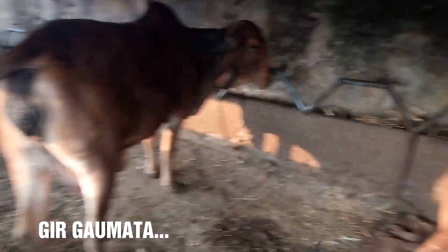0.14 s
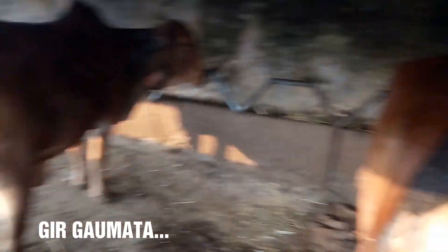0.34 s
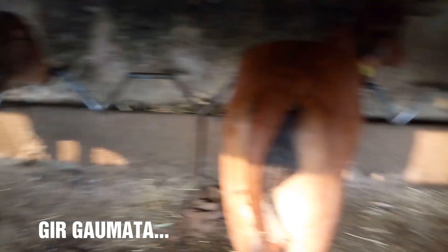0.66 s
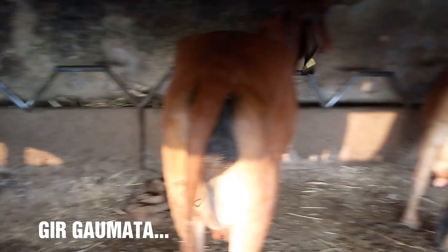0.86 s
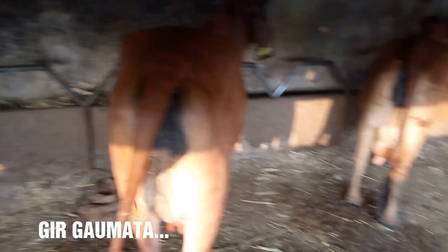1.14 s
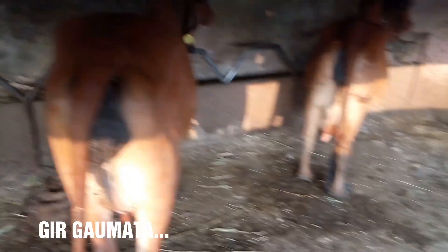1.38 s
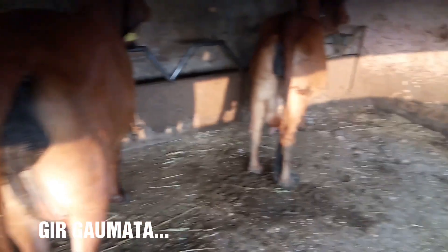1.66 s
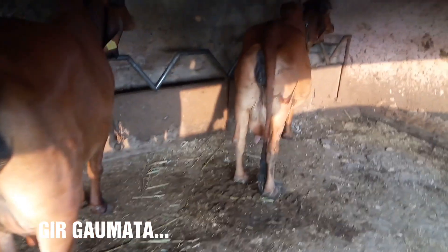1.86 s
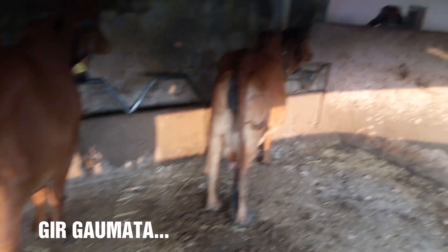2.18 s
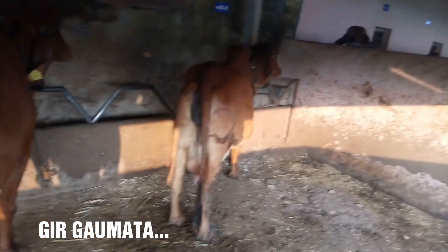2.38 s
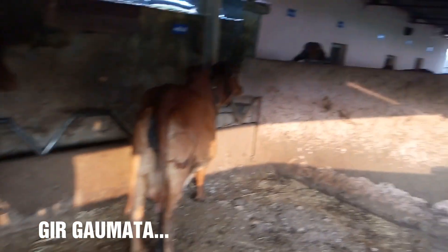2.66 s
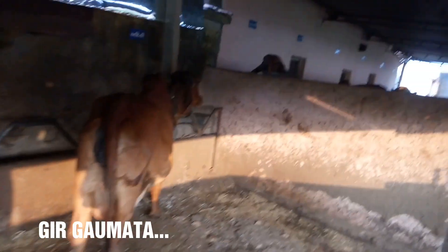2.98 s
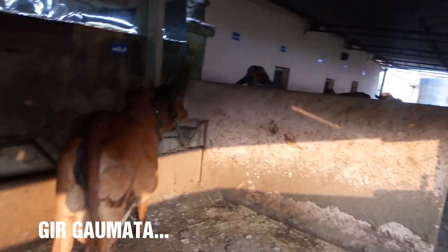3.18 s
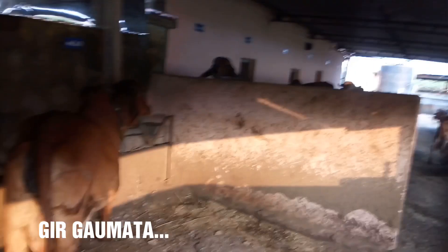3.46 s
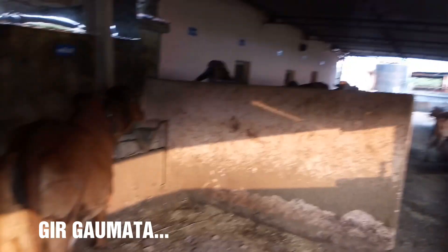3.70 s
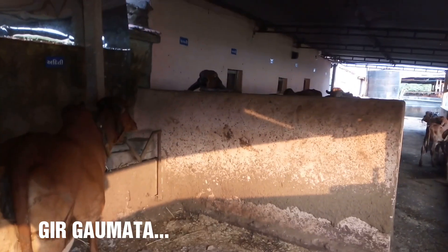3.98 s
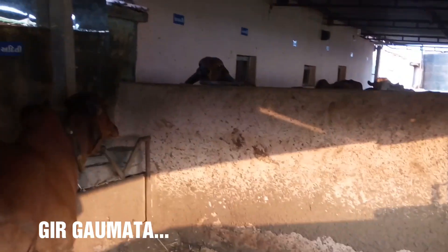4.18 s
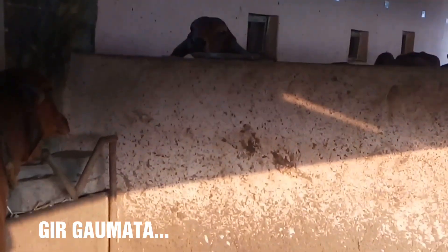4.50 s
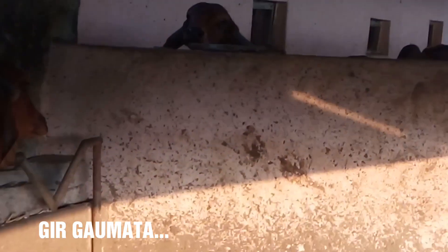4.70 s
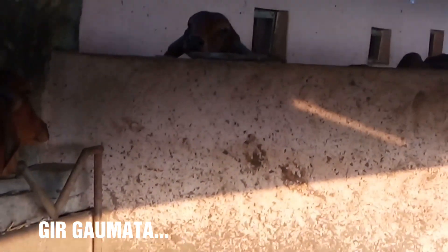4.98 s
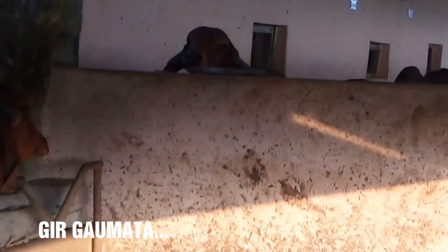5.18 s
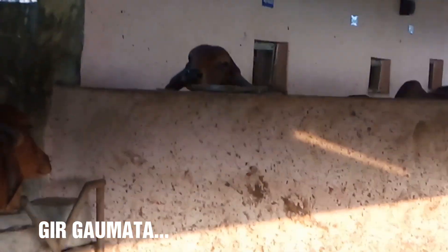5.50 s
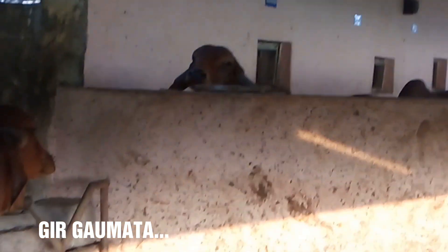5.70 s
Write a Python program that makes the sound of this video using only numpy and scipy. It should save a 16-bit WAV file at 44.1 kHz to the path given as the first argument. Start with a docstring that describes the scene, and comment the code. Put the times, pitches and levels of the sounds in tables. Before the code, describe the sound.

Light metallic clinks from bells and a chain mix with soft hoof scuffs and straw rustles in a cattle shed. A dull, faraway low swells and stops, crossed by a few handling clicks on the microphone. One loud, low moo then sounds up close, breathy and echoing briefly, before fading into a quiet snort, faint ticks and the shed's steady background noise.

```python
"""Cow in an echoing shed

Close to the microphone a cow moos once, vocal folds pulsing through throat and mouth; another lows far off.
Struck neck bells and a chain clink, hooves shuffle in straw and a nose snorts, over the shed's murmur.
The microphones sit behind two ports of a hand-held phone: the right one is muffled, of opposite
polarity, and picks up finger taps through the case."""
import sys
import numpy as np
from scipy import signal
from scipy.fft import rfft, irfft
from scipy.io import wavfile
from scipy.ndimage import uniform_filter1d

SR = 44100
rng = np.random.default_rng(int(sys.argv[2]) if len(sys.argv) > 2 else 0)


def int16_out(signal):
    """Quantize to a 16-bit WAV file."""
    q = np.round(np.clip(np.atleast_2d(signal).T, -1, 1) * 32767)
    wavfile.write(sys.argv[1], SR, q.astype(np.int16))


N = 257984

# room tone of the shed: (frequency [Hz], relative level [dB])
MURMUR_SPECTRUM = [(25, -23.5), (50, -15.5), (95, -7), (200, -4), (370, -2.5), (760, -19), (1540, -20.5),
                   (2500, -24.5), (6450, -26), (9300, -16.5), (11500, -26.5), (12300, -41.5),
                   (15400, -63.5)]
# decay of the shed's echo: (frequency [Hz], t60 [s])
SHED_DECAY = [(100, 0.77), (260, 1.484), (600, 0.88), (1500, 0.57), (4000, 0.19), (10000, 0.18)]
# how alike diffuse sound is at the two ports: (frequency [Hz], coherence [0-1])
PORT_COHERENCE = [(60, .85), (130, .99), (450, .995), (800, .94), (1400, .15), (4000, .02)]
# right port against the left: (frequency [Hz], gain [dB], phase [rad])
RIGHT_PORT = [(60, -5.5, 1.5), (319, -2.5, 0), (353, -5, 0.16), (493, -4.5, 0.82), (597, -3.5, 0.89),
              (773.4, -7, -5), (853.6, 2.5, 1.1), (945, -10, -2), (1210, -2, -1), (1550, -6, -1),
              (2195, -5, -2.5), (3800, -12.5, -5), (5600, -17.5, -6), (7440, -40.5, -18.5),
              (15100, -22.5, -31.5)]
# fingers on the case: (time [s], snap level [dB], thump level [dB])
FINGER_TAPS = [(2.415, -17, -47), (2.4808, -16, -36), (2.511, -3, -19), (5.592, -57.5, -46.5),
               (5.689, -57, -49), (5.802, -40, -32.5)]
# straw, low scuffs and hooves set down: (time [s], level [dB], centre [Hz], t60 [s])
STRAW_RUSTLES = [(.79, -64.5, 8150, 0.38), (1.055, -45, 5140, 0.37), (1.43, -60, 8600, 0.63),
                 (3.109, -59.5, 6050, 0.18), (4.992, -57, 3980, 0.51), (5.238, -47, 4500, .2),
                 (5.61, -60, 4500, .25)]
FLOOR_SCUFFS = [(.567, -53, 370, 0.2), (.785, -53.5, 910, 0.27), (2.58, -49, 378, 0.26),
                (3.13, -51.5, 760, 0.12), (5.24, -43, 1243, 0.19), (5.61, -62, 1610, 0.26)]
HOOF_STEPS = [(1.975, -51.5, 860, .23), (2.818, -54.5, 1240, .12), (2.849, -52.5, 960, .19),
              (2.886, -42, 722, .27), (2.925, -55.5, 890, .12), (3.016, -55, 1160, .07)]
# dry ticks: (time [s], level [dB], frequency [Hz])
TICKS = [(0.369, -35, 9600), (1.619, -30, 9400), (3.625, -8.5, 9060), (3.688, -20, 7894), (5.12, -25, 7400),
         (5.478, -47, 7450)]
# ringing modes of the bells and chain: (frequency [Hz], relative level [dB], t60 [s])
BIG_BELL_MODES = [(2590, -12.5, 0.9), (2703, -13, 0.76), (6950, -11, 0.87), (7125, 0.5, 0.54),
                  (9120, -11.5, 0.61), (10900, -17.5, 0.6), (14140, -42, .4)]
SMALL_BELL_MODES = [(7380, -9, .14), (7520, 0, .16), (7700, -10, .1), (8200, -14, .12), (9150, -12, .2),
                    (9478, -9, .22), (11330, -18, .1), (14800, -24, .06)]
TINY_BELL_MODES = [(9400, 8.5, 0.16), (12600, -8, 0.1), (14500, 5, .22), (14700, -8, .12), (15200, 2, .15),
                   (15300, -5, .12)]
CHAIN_MODES = [(2638, -18.5, 0.2), (3376, -16, 0.8), (4200, -8, 0.31), (4500, -4.5, 0.23), (5650, -4, .17),
               (5975, -3, 0.12), (6460, -21, .15), (6950, -11, 0.12), (8800, 2, 0.22), (9640, 2.5, 0.28),
               (10200, 0, 0.27)]
# blows on them: (time [s], ring level [dB], clack level [dB], hardness [dB/octave])
BIG_BELL_BLOWS = [(0.0, -42.5, -49, -1.7), (0.059, -44.5, -45.5, 13), (0.376, -72, -57, -13),
                  (1.923, -51, -63, 2.5)]
SMALL_BELL_BLOWS = [(.198, -30.5, -48.5, -5), (.537, -35, -44, 3), (1.542, -36, -46.5, -24),
                    (2.222, -44, -56, -33)]
TINY_BELL_BLOWS = [(1.806, -56.5, -51.5, .1), (2.02, -56, -56, .1), (2.448, -61, -51.5, .1)]
CHAIN_BLOWS = [(1.056, -51, -42, -2), (1.071, -42.5, -44, -2.5), (5.606, -68, -50, 4)]
# air rushing through the nose: (centre [Hz], width [Hz], level [dB])
SNORT_BANDS = [(2000, 700, -49), (3170, 700, -55), (6370, 5200, -43)]
# resonances of the far cow, and of the near one with mouth shut and open:
# (centre [Hz], width before spreading [Hz], relative level [dB])
FAR_THROAT = [(360, 73, 5), (1033, 86, -2), (1417, 100, -5), (1860, 144, -8), (2393, 82, -6.5),
              (2705, 79.5, -10)]
SHUT_THROAT = [(240, 31, -9.5), (372.8, 58, -6.5), (599, 90, -17.5), (1440, 310, -33.5), (2042, 15, -21.5),
               (2304, 71, -23)]
OPEN_THROAT = [(264.74, 86.7, -4), (1043, 102.5, -17), (1548, 90, -25), (1877.6, 103, -24.5),
               (2057, 75, -38.5), (2470, 110, -35.5), (3263, 80, -46.5), (3620, 100, -48), (3846, 120, -45)]
# hiss of the near cow's breath: (frequency [Hz], relative level [dB])
BREATH_SPECTRUM = [(2000, -19.5), (3500, 0), (4100, -4.5), (4500, 0.5), (5200, -1.5), (6500, -0.5),
                   (9000, 7), (10800, -5), (11800, -18.5), (15500, -41.5)]
# two narrow whistles in that breath: (time [s], upper [Hz], lower [Hz])
BREATH_WHISTLES = [(3.6, 9030, 6630), (4.1, 7950, 6320), (4.4, 8800, 5865)]
# course of the close moo: (time [s], effort [dB], pitch [Hz])
MOO_CONTOUR = [(3.325, -54, 79.7), (3.368, -36.5, 79.62), (3.376, -24.5, 79.92), (3.428, -20, 82.05),
               (3.504, -21.5, 87.26), (3.527, -15.5, 90.3), (3.598, -9.5, 92.43), (3.649, -10.5, 94.12),
               (3.879, -7, 93.4), (4.102, -8, 92.26), (4.165, -9.5, 90.18), (4.236, -8.5, 87.35),
               (4.3, -8.5, 83.4), (4.352, -10.5, 80.54), (4.41, -20, 80), (4.62, -43, 78.7),
               (4.7, -75, 79.1)]


def gain_of(db):
    """Decibels to amplitude."""
    return 10 ** (np.asarray(db) / 20)


def unit_rms(x):
    """Scales to an RMS of one."""
    return x / np.sqrt(np.mean(x ** 2) + 1e-20)


def curve_at(points, hz, column=1):
    """Reads a table along a logarithmic frequency axis."""
    table = np.transpose(points)
    return np.interp(np.log(hz + 1), np.log(table[0] + 1), table[column])


def bump(t, centre_s, span_s):
    """A smooth rise to one and back."""
    return np.exp(-((t - centre_s) / span_s) ** 2)


def add(mix, start_s, sound):
    """Lays a sound into the mix and returns the mix."""
    part = mix[round(max(start_s, 0) * SR):][:len(sound)]
    part += sound[:len(part)]
    return mix


def filtered(x, order, hz, kind="low"):
    """A flat-topped pass filter."""
    return signal.sosfilt(signal.butter(order, hz, kind, fs=SR, output="sos"), x)


def dulled(x):
    """Takes the highest treble off a noise."""
    return filtered(x, order=10, hz=11700)


def coloured(x, gain):
    """Multiplies the spectrum by gain(hz)."""
    n = x.shape[-1]
    return irfft(rfft(x) * gain(np.fft.rfftfreq(n, 1 / SR)), n)


def resonate(x, hz, width):
    """One resonance, steady or gliding along the curve hz."""
    r = np.exp(-np.pi * width / SR)
    if np.ndim(hz) == 0:
        return 2 * signal.lfilter([1 - r], [1, -r * np.exp(2j * np.pi * hz / SR)], x).real
    turn = np.exp(2j * np.pi * np.cumsum(hz) / SR)
    return 2 * (turn * signal.lfilter([1 - r], [1, -r], x * turn.conj())).real


def steep_band(x, hz, width):
    """The same resonance twice, for steeper skirts."""
    return resonate(resonate(x, hz, width), hz, width)


def diffuse_pair(left, other):
    """Diffuse sound at two ports: alike in the bass, unrelated in the treble."""
    alike = lambda hz: np.clip(curve_at(PORT_COHERENCE, hz), 0, 1)
    right = coloured(left, alike) + coloured(other, lambda hz: np.sqrt(1 - alike(hz) ** 2))
    return np.array([left, right])


def murmur():
    """Room tone all around the microphone, with drifting patches and a slow swell."""
    frames, hz = N // 256 + 5, np.fft.rfftfreq(1024, 1 / SR)
    a, b, c, d, patches = rng.standard_normal((frames, 513, 5)).T
    patches = unit_rms(uniform_filter1d(uniform_filter1d(patches, 30, 0), 14, 1))
    swell = unit_rms(uniform_filter1d(rng.standard_normal(frames), 25))
    level_db = curve_at(MURMUR_SPECTRUM, hz)[:, None] + 1.8 * patches + 1.2 * swell
    spectra = np.array([a + 1j * b, c + 1j * d]) * gain_of(level_db)
    noise = signal.istft(spectra, nperseg=1024, noverlap=768)[1][:, :N]
    return gain_of(-60) * diffuse_pair(*unit_rms(noise))


def low_rumble():
    """A faint low noise that swells and fades with the moo."""
    times, efforts, _ = np.transpose(MOO_CONTOUR)
    t = np.arange(times[0], times[-1], 1 / SR)
    noise = unit_rms(filtered(rng.standard_normal(len(t)), order=3, hz=120))
    return add(np.zeros(N), times[0], gain_of(-40.5 + 0.32 * np.interp(t, times, efforts)) * noise)


def shed_echo(x):
    """Sparse reflections of random sign, each band dying at its own speed."""
    echoes = np.zeros((2, 3 * SR // 2))
    slots = np.arange(400, 3 * SR // 2 - 20, 20)
    arrivals = slots + rng.integers(0, 20, (2, len(slots)))
    np.put_along_axis(echoes, arrivals, rng.choice([-1., 1.], arrivals.shape), 1)
    hz, t, spectra = signal.stft(echoes, SR, nperseg=512)
    spectra = spectra * gain_of(-60 * t / curve_at(SHED_DECAY, hz)[:, None])
    spectra /= np.linalg.norm(spectra[0], axis=1)[:, None]  # the same echo energy in every band
    tail = diffuse_pair(*signal.istft(spectra, SR, nperseg=512)[1])
    return signal.fftconvolve(x[None], tail / np.linalg.norm(tail[0]), axes=1)[:, :N]


def hand_scatter(x, t60_s=0.053):
    """Direct sound at both ports: its treble scatters round the moving hand to reach the right one."""
    scatter = rng.standard_normal((3, 1500)) * gain_of(-60 * np.arange(1500) / SR / t60_s)
    scatter /= np.linalg.norm(scatter[0])
    turn = 2 * np.pi * (1.303 * np.arange(N) / SR + np.arange(3)[:, None] / 3)  # three paths take turns
    paths = signal.oaconvolve(x * np.sqrt(2 / 3) * np.cos(turn), scatter, axes=1)
    return diffuse_pair(x, paths.sum(0)[:N])


def ports(sound):
    """The right port is muffled, late and inverted."""
    response = lambda hz: gain_of(curve_at(RIGHT_PORT, hz)) * np.exp(1j * curve_at(RIGHT_PORT, hz, 2))
    return np.array([sound[0], -coloured(sound[1], response)])


def finger_taps(snap_s=.00035):
    """Handling noise: a sharp snap that swings back, then a low thump of the case."""
    out, t = np.zeros(N), np.arange(4000) / SR
    snap = 1.6 * np.exp(-t / snap_s) * (1 - t / snap_s) * (1 - np.exp(-t / .00002))
    thump = np.exp(-t / 0.0098) * np.sin(2 * np.pi * 105 * t)
    thump += 0.93 * np.exp(-t / 0.00197) * np.sin(2 * np.pi * 330 * t)
    for start_s, snap_db, thump_db in FINGER_TAPS:
        add(out, start_s, gain_of(snap_db) * snap + gain_of(thump_db) * thump)
    return filtered(out, 3, [70, 2500], "band")  # the case damps the treble


def shuffles(events, rise_share, width_share, grain_db, knock=0, knock_s=.003):
    """Hooves and straw on the floor: grainy noise swells and dies; knock lifts the first contact."""
    out, t = np.zeros(N), np.arange(SR // 3) / SR
    for start_s, level_db, hz, t60 in events:
        noise, grain = rng.standard_normal((2, len(t)))
        noise = noise * gain_of(grain_db * unit_rms(uniform_filter1d(grain, 150)))
        rise_s = rise_share * t60
        since_peak = np.maximum(t - rise_s, 0)
        envelope = np.minimum(t / rise_s, 1) * gain_of(level_db - 60 * since_peak / t60)
        envelope *= 1 + knock * np.exp(-since_peak / knock_s)
        add(out, start_s, envelope * unit_rms(steep_band(noise, hz, width_share * hz)))
    return out


def ticks():
    """Dry ticks: a few cycles, gone in about a millisecond."""
    out, t = np.zeros(N), np.arange(200) / SR
    for start_s, level_db, hz in TICKS:
        add(out, start_s, gain_of(level_db) * np.exp(-t / 0.00052) * np.sin(2 * np.pi * hz * t))
    return out


def snort(start_s=5.05, rise_s=.1, hold_s=.04, t60_s=.3):
    """Air blown through the nose: swells, holds, dies away."""
    t = np.arange(SR // 2) / SR
    noise = rng.standard_normal(len(t))
    blow = sum(gain_of(db) * unit_rms(steep_band(noise, hz, width)) for hz, width, db in SNORT_BANDS)
    fall_db = -60 * np.maximum(t - rise_s - hold_s, 0) / t60_s
    return add(np.zeros(N), start_s, np.minimum(t / rise_s, 1) * gain_of(fall_db) * blow)


def struck_metal(modes, blows, flutter_db):
    """Each blow clacks and rings the modes, harder ones the higher; mode levels waver at random."""
    out, t = np.zeros(N), np.arange(SR // 2) / SR
    attack = 1 - np.exp(-t / 0.008)
    for start_s, ring_db, clack_db, hardness in blows:
        noise = rng.standard_normal((len(modes) + 1, len(t)))
        flutter = flutter_db * unit_rms(uniform_filter1d(uniform_filter1d(noise[1:], 400), 400))
        ring = np.zeros(len(t))
        for (hz, db, t60), waver_db in zip(modes, flutter):
            mode_db = db + hardness * np.log2(hz / 7000) - 60 * t / t60 + waver_db
            ring += gain_of(mode_db) * np.sin(2 * np.pi * (hz * t + rng.random()))
        clack = unit_rms(dulled(resonate(noise[0], hz=8970, width=1130)))
        clack *= gain_of(clack_db - 60 * t / 0.24)
        add(out, start_s, (gain_of(ring_db) * ring + clack) * attack)
    return out


def vocal_folds(hz, rough, partial_limit, jitter, waver_db=1.4, smear_rad=.12):
    """Even pulses and a puff of noise each cycle, shared out by roughness; also returns the phase."""
    wobble = unit_rms(uniform_filter1d(rng.standard_normal(len(hz)), 500))
    cycles = np.cumsum(hz * (1 + jitter * rough * wobble)) / SR
    knots = rng.standard_normal((partial_limit, len(hz) // 6000 + 2))
    place = np.linspace(0, knots.shape[1] - 1, len(hz))
    pulses = np.zeros(len(hz))
    for k in range(1, partial_limit):  # each partial wavers on its own; higher ones arrive later
        waver = np.interp(place, np.arange(knots.shape[1]), gain_of(waver_db * knots[k]))
        pulses += waver * np.cos(2 * np.pi * k * cycles - smear_rad * k ** 2)
    puffs = (.3 + np.exp(-(cycles % 1) / 0.68)) * rng.standard_normal(len(hz))
    return (1 - rough) * unit_rms(pulses) + rough * unit_rms(puffs), cycles


def throat(drive, modes, spread, tilt_db=0):
    """Resonances side by side, of alternate sign, widened by spread and tilted by tilt_db per octave."""
    return sum((-1) ** k * gain_of(db + tilt_db * np.log2(hz / 270))
               * steep_band(drive, hz, spread * width) for k, (hz, width, db) in enumerate(modes))


def far_cow(start_s=1.7, peak_s=2.517, end_s=2.76):
    """A hoarse, dull low from across the shed: swells slowly, sags in pitch, stops quickly."""
    t = np.arange(start_s, end_s, 1 / SR)
    level_db = np.interp(t, [start_s, peak_s, end_s], [-67.5, -46, -93.5])
    pitch_hz = 87.4 - 2.3 * (t - start_s)
    drive, _ = vocal_folds(pitch_hz, rough=.6, partial_limit=34, jitter=0.013)
    return add(np.zeros(N), start_s, gain_of(level_db) * unit_rms(throat(drive, FAR_THROAT, spread=1.8)))


def patchy(x, depth_db):
    """Makes a wheeze uneven over time and frequency."""
    spectra = signal.stft(x, nperseg=512)[2]
    patches = rng.standard_normal(spectra.shape)
    patches = unit_rms(uniform_filter1d(uniform_filter1d(patches, 4, axis=0), 14, axis=1))
    return signal.istft(spectra * gain_of(depth_db * patches), nperseg=512)[1][:len(x)]


def breath(t, cycles, rough):
    """Hiss heard close up, one gust a cycle, with two whistles while the voice is clean."""
    gusts = (1 + 0.25 * np.cos(2 * np.pi * cycles)) * rng.standard_normal(len(t))
    hiss = unit_rms(coloured(gusts, lambda hz: gain_of(curve_at(BREATH_SPECTRUM, hz))))
    times, *glides = np.transpose(BREATH_WHISTLES)
    whistles = sum(unit_rms(resonate(gusts, np.interp(t, times, hz), width=160)) for hz in glides)
    return hiss + gain_of(-9.0) * (1 - rough) * whistles


def mouth_and_nose(t, drive, opened, slack, rough):
    """Shapes the voice at an even level: brighter as the mouth opens, duller as the folds slacken."""
    mid_call_dip = bump(t, centre_s=3.93, span_s=0.28)  # two resonances sink, darkening the vowel
    second = (595 * (1 - .15 * mid_call_dip), 100, -7)
    third = (860 * (1 - 0.099 * mid_call_dip), 96, -19.5)
    open_modes = [OPEN_THROAT[0], second, third, *OPEN_THROAT[1:]]
    hoarse_modes = [(620, 534, -12.5), (1200, 690, -23.5)]  # hoarseness smears the middle resonances
    nose_mode = (236, 58, -20)
    tilt_db = -1.53 + (2.65 - 1.6 * slack) * opened
    mouth = 0.89 * opened
    tone = throat(mouth * drive, open_modes, spread=1.27, tilt_db=tilt_db)
    tone += throat((1 - mouth) * drive, SHUT_THROAT, spread=1.36, tilt_db=tilt_db)
    tone += throat(mouth * rough ** 2 * drive, hoarse_modes, spread=2.1)
    tone -= throat(drive, [nose_mode], spread=3.16)
    tone = filtered(tone, 8, 176, "high")  # the mouth radiates little bass
    return tone / np.sqrt(uniform_filter1d(tone ** 2, 2500) + 1e-20)


def near_cow(opens_s=3.504, opening_s=.023, slack_hz=79.32, taut_hz=94.5):
    """Close to the microphone: a shut-mouthed grunt opens to a clean tone and breaks into a growl."""
    times, efforts, pitches = np.transpose(MOO_CONTOUR)
    t = np.arange(times[0], times[-1], 1 / SR)
    effort_db, hz = np.interp(t, times, efforts), np.interp(t, times, pitches)
    opened = np.clip((t - opens_s) / opening_s, 0, 1)
    slack = np.clip((taut_hz - hz) / (taut_hz - slack_hz), 0, 1) ** 3.6
    rough = np.minimum(0.041 + slack + .3 * (1 - opened), 1)  # slack folds and shut lips are rough
    drive, cycles = vocal_folds(hz, rough, partial_limit=46, jitter=0.0595)
    turbulence = 0.44 * filtered(rng.standard_normal(len(t)), 2, 1300, "high")
    voice = gain_of(effort_db) * mouth_and_nose(t, drive + turbulence, opened, slack, rough)
    hiss = breath(t, cycles, rough)
    sigh = gain_of(-43) * bump(t, centre_s=4.48, span_s=.05)  # air let out as the voice fails
    wheeze = (gain_of(-38.5 + 0.45 * effort_db) + sigh) * dulled(patchy(hiss, depth_db=2.5))
    return add(np.zeros(N), times[0], voice + wheeze)


def scene():
    """The shed from beside the near cow; the far one arrives with a larger share of echo."""
    near, far = near_cow() + low_rumble(), far_cow()
    clinks = (struck_metal(BIG_BELL_MODES, BIG_BELL_BLOWS, flutter_db=5.5)
              + struck_metal(SMALL_BELL_MODES, SMALL_BELL_BLOWS, flutter_db=5.0)
              + struck_metal(TINY_BELL_MODES, TINY_BELL_BLOWS, flutter_db=2.5)
              + struck_metal(CHAIN_MODES, CHAIN_BLOWS, flutter_db=8.0))
    nose = snort()
    hooves = shuffles(HOOF_STEPS, rise_share=.017, width_share=0.7, grain_db=6, knock=gain_of(3))
    scuffs = shuffles(FLOOR_SCUFFS, rise_share=0.11, width_share=0.49, grain_db=4.5)
    straw = shuffles(STRAW_RUSTLES, rise_share=0.06, width_share=0.84, grain_db=3.5)
    stirring = clinks + ticks() + dulled(nose + hooves + scuffs + straw)
    echo = shed_echo(gain_of(-9.5) * near + gain_of(-4.5) * far + gain_of(-9.0) * stirring)
    direct = hand_scatter(near + stirring + gain_of(-7) * far)
    through_case = finger_taps() * gain_of([[-26], [0]])  # mostly into the right microphone
    return ports(direct + echo + murmur()) + through_case


def record(dry, bass_cut_hz=70, ceiling=1.04, top_hz=15420):
    """The phone's inputs: hiss, bass cut, soft overload of the loudest peaks, then the band limit."""
    hiss = gain_of([[-95], [-74]]) * dulled(rng.standard_normal((2, N)))
    both = filtered(dry + hiss, 2, bass_cut_hz, "high")
    both = both / (1 + abs(both / ceiling) ** 5) ** (1 / 5)
    band_limit = signal.firwin(511, top_hz, window=("kaiser", 9), fs=SR)
    return np.clip(signal.oaconvolve(both, band_limit[None], "same"), -1, 1)


dry = scene()
out = record(dry)
int16_out(out)
```